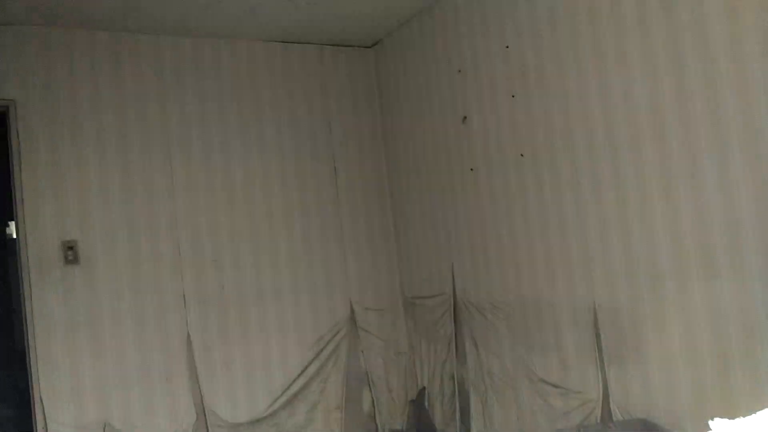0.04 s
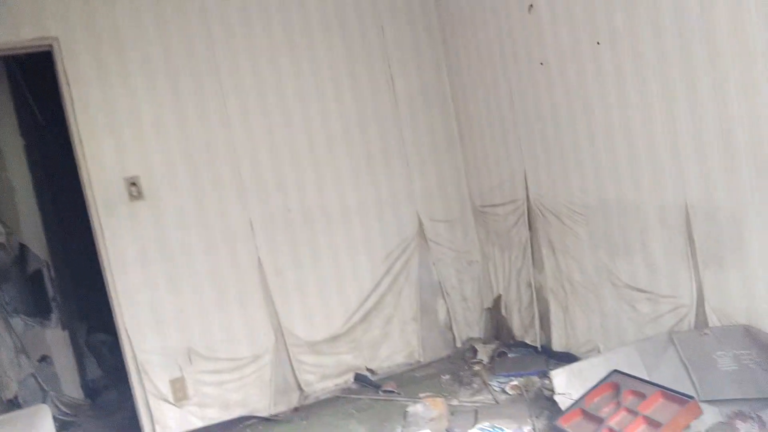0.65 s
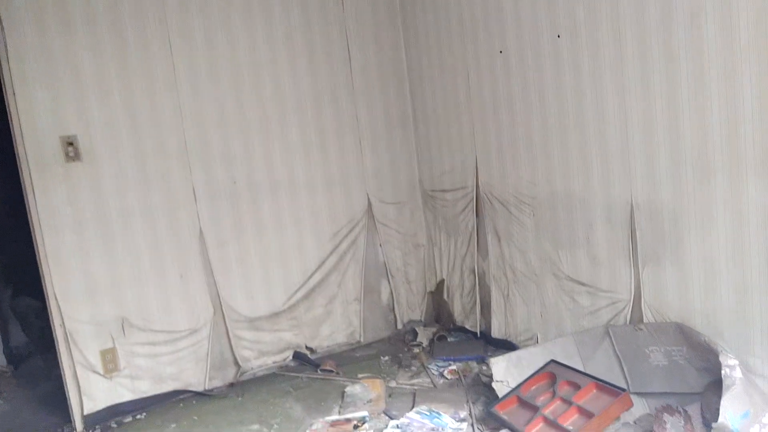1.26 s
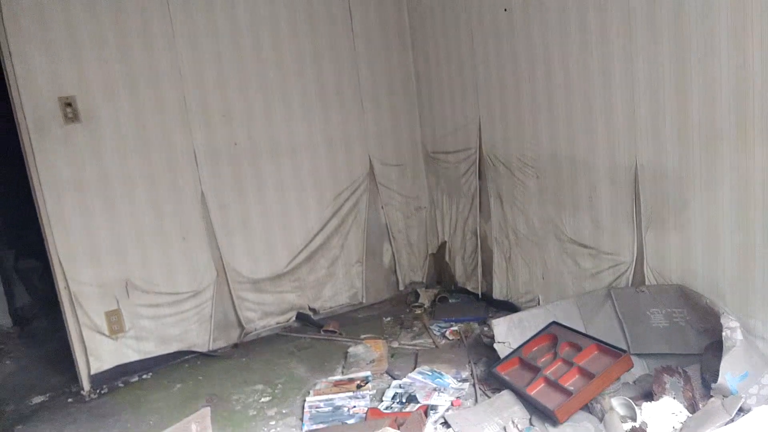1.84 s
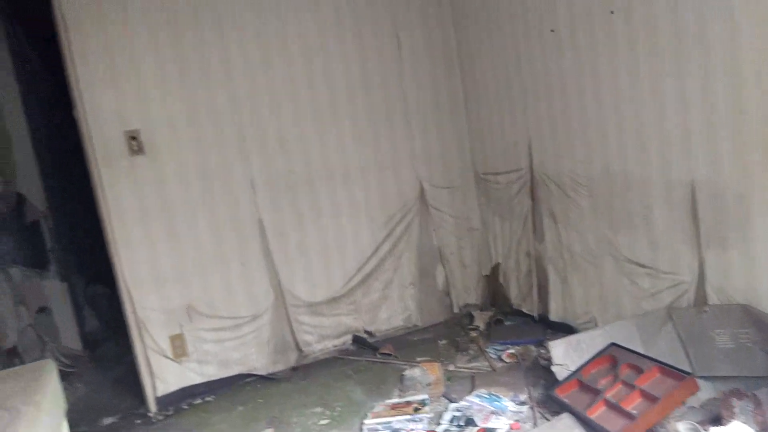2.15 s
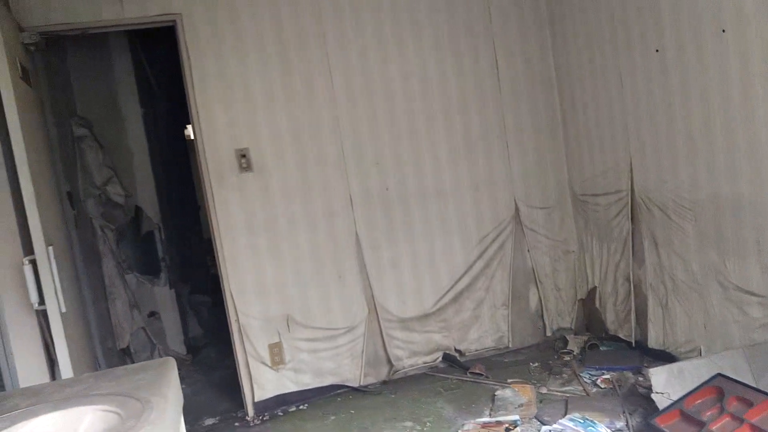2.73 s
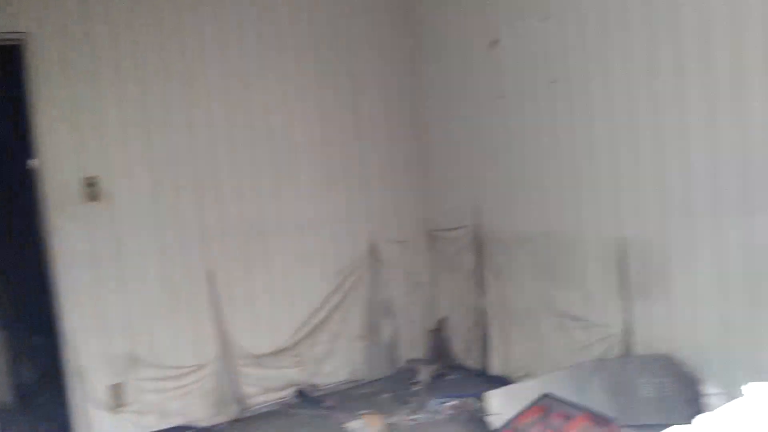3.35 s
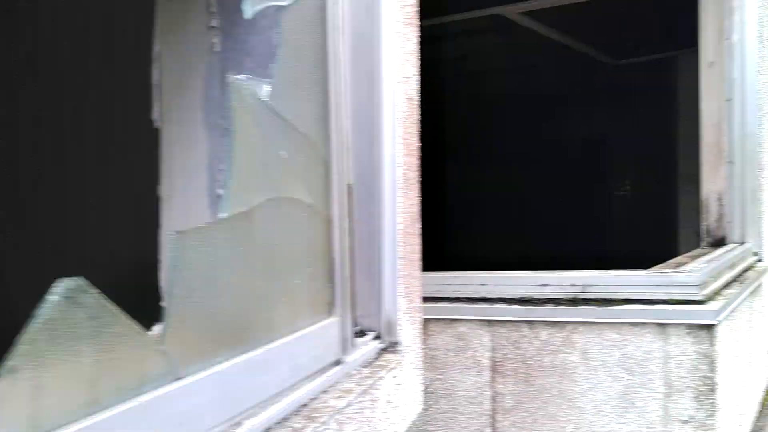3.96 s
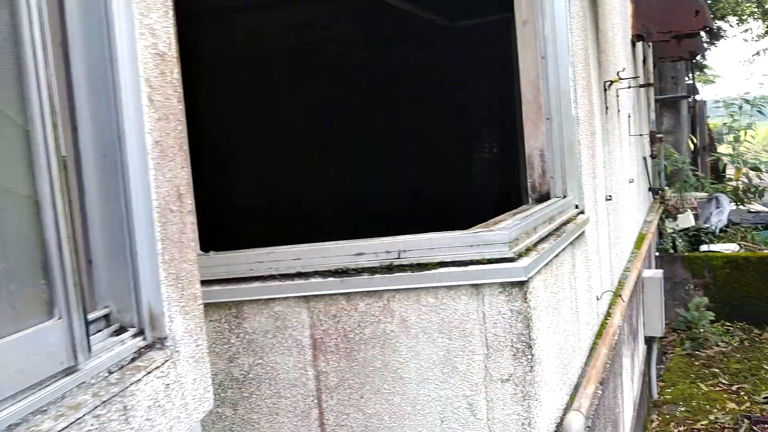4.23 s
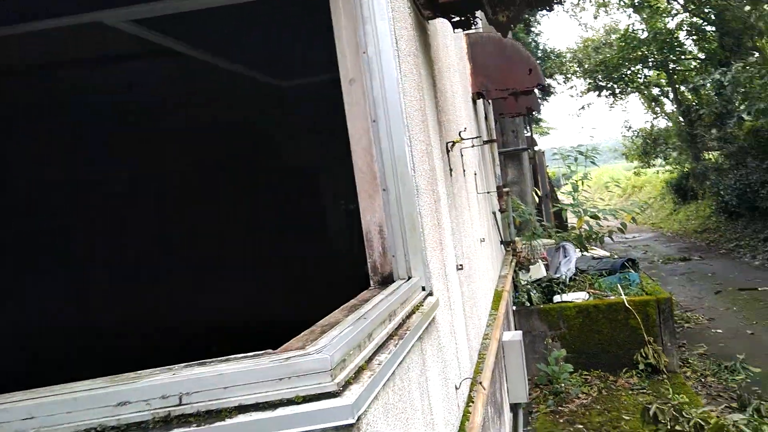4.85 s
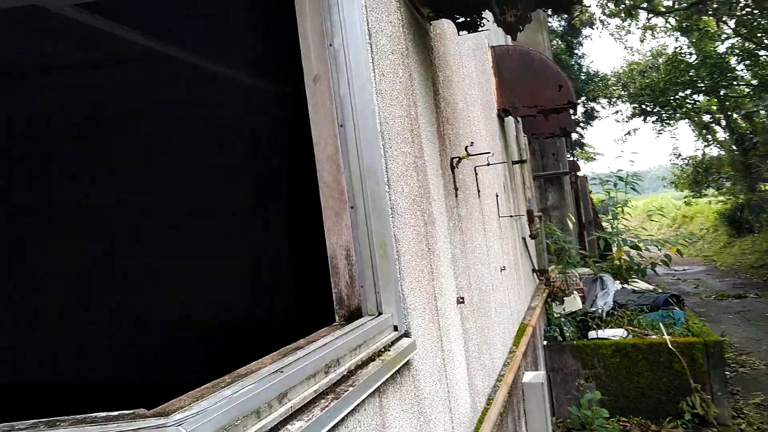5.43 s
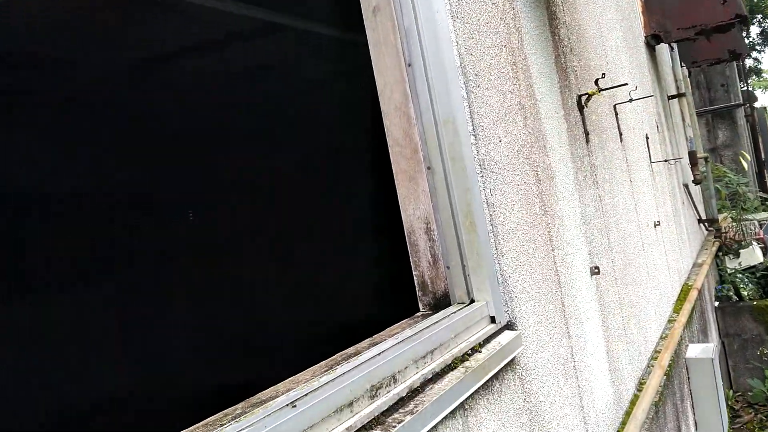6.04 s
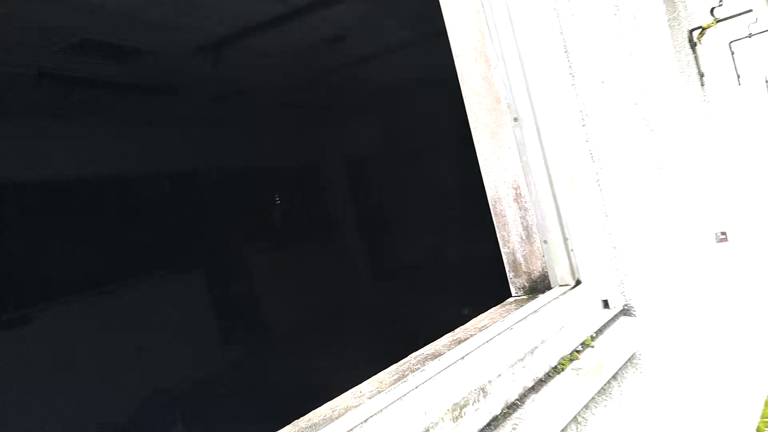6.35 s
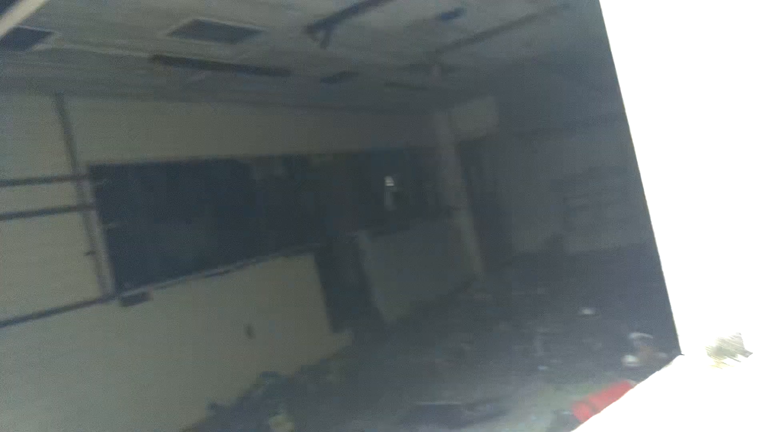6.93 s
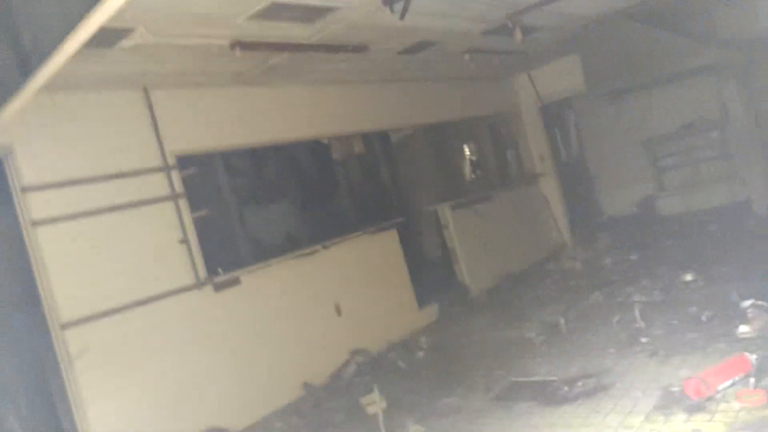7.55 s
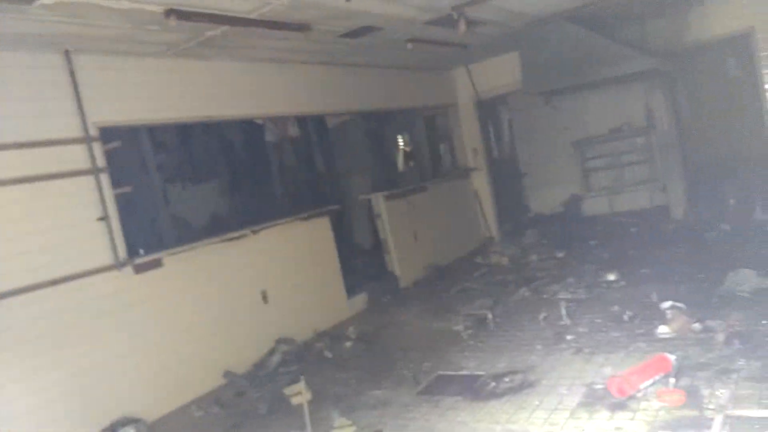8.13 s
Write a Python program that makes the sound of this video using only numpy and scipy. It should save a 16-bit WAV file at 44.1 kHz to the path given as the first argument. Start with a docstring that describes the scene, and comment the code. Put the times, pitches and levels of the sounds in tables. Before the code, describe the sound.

Someone steps slowly over gritty debris at an abandoned building. A few light knocks and scuffs come first, then a lull in which small birds whistle far off. Halfway through, grit crunches and grinds under the soles, followed by heel knocks on loose pieces and a sharp snap of a brittle shard near the end. The steps are close, with a slight room echo, over faint insects and low rumbling air.

```python
"""Slow steps over gritty debris, from one window of an abandoned building to the next.
Heels knock on loose pieces, grit crunches and grinds under the soles, a brittle shard snaps:
each a train of tiny breaks coloured by its material, reflected by a near wall and empty rooms.
Small birds whistle far off, over insects, a distant rush and a low rumble of air."""
import sys
import numpy as np
from scipy import signal
from scipy.fft import rfft, irfft
from scipy.io import wavfile
from scipy.ndimage import uniform_filter1d

SR = 44100
rng = np.random.default_rng(int(sys.argv[2]) if len(sys.argv) > 2 else 0)


def store_pcm(level_fs):
    """Save levels as 16-bit WAV."""
    pcm = np.round(np.clip(level_fs, -1, 1) * 32767).astype(np.int16)
    wavfile.write(sys.argv[1], SR, np.atleast_2d(pcm).T)


N = 361179

# sole rolling over grit: t/s, length/s, grinding level/dB, grain peak/dB, grain ring f/Hz
STROKES = [(3.739, 0.38, -66, -48.5, 2870), (4.221, .22, -61, -43, 2980), (4.689, .21, -45, -38, 4530),
           (5.132, .3, -43, -37.5, 5030), (5.44, 0.19, -47, -38.5, 12000), (6.111, .23, -63, -42, 8900),
           (7.029, .14, -59, -41, 5000), (7.49, 0.25, -55, -33.5, 13000), (7.739, .17, -54, -35, 10970)]
EASE_DB = 10  # drop in weight over a stroke


def amp(db):
    """Decibels to gain."""
    return 10 ** (np.asarray(db) / 20)


def unit(x):
    """Scale to rms 1."""
    return x / np.sqrt(np.mean(x ** 2) + 1e-20)


def read(points, hz):
    """Interpolate on a log-frequency axis."""
    f, value = np.transpose(points)
    return np.interp(np.log(hz + 1), np.log(f + 1), value)


def add(mix, s, sound):
    """Mix a sound in at time s."""
    part = mix[max(round(s * SR), 0):][:len(sound)]
    part += sound[:len(part)]


def at_level(x, db):
    """Give a hit the energy of 10 ms at this level."""
    return amp(db) * x * np.sqrt(SR / 100) / (np.linalg.norm(x) + 1e-12)


def causal(x, db):
    """Minimum-phase filter from a gain per FFT bin."""
    response = np.fft.ifft(np.exp(np.conj(signal.hilbert(np.log(amp(db)))))).real
    return signal.oaconvolve(x, response[:len(db) // 2])[:len(x)]


def colour(x, spectrum, ring_hz=1000, ring_db=0, ring_q=1, treble_db=0):
    """Material spectrum, one piece's resonance of height |ring_db|, and a treble shelf."""
    hz = abs(np.fft.fftfreq(4096, 1 / SR))
    peak = 1 / (1 + (2 * ring_q * (hz / ring_hz - 1)) ** 2)
    resonance_db = 10 * np.log10(1 + (amp(abs(ring_db)) ** 2 - 1) * peak)
    shelf_db = treble_db * hz ** 2 / (hz ** 2 + 2600 ** 2)
    return causal(x, read(spectrum, hz) + resonance_db + shelf_db)


def wash(spectrum, patchy_db):
    """Shaped noise with drifting spectral patches, rms 1."""
    hz = np.fft.rfftfreq(2048, 1 / SR)
    real, imag, patches = rng.standard_normal((3, N // 512 + 5, len(hz)))
    patches = unit(uniform_filter1d(uniform_filter1d(patches, size=9, axis=0), size=25, axis=1))
    frames = (real + 1j * imag) * amp(read(spectrum, hz) + patchy_db * patches)
    return unit(signal.istft(frames.T, nperseg=2048, noverlap=1536)[1][:N])


def reverb(x, t60s, delay_s):
    """Scattered reflections, decaying per band; t60s: f/Hz, T60/s."""
    taps = rng.choice([-1., 1.], SR) * (rng.random(SR) < 5000 / SR) * (np.arange(SR) > delay_s * SR)
    hz, t, frames = signal.stft(taps, SR, nperseg=256)
    tail = signal.istft(frames * amp(-60 * t / read(t60s, hz)[:, None]), SR, nperseg=256)[1]
    return signal.oaconvolve(x, tail / np.linalg.norm(tail))[:N]


def rumble(t, rise_db_per_s=0.6946, gust_s=3.85, gust_width_s=0.29, gust_db=6):
    """Slow eddies press on the microphone, growing toward the open air; one gust."""
    # eddy spectrum: f/Hz, level/dB
    spectrum = [(1, -16), (4, 11), (12, 12), (20, 4.5), (30, -0.5), (50, 1), (65, -10.5), (80, -16),
                (100, -12), (140, -21.5), (300, -27), (700, -49), (3000, -90)]
    db = -52 + rise_db_per_s * t + gust_db * np.exp(-((t - gust_s) / gust_width_s) ** 2)
    gain = amp(read(spectrum, np.fft.rfftfreq(N, 1 / SR)))
    eddies = irfft(rfft(rng.standard_normal(N)) * gain, N)
    return amp(db) * unit(eddies)


def thrum(t, start_s=6.72, rise_s=0.2, fade_db_per_s=3):
    """Low thrum at the second window: quick rise, slow fade."""
    # thrum spectrum: f/Hz, level/dB
    spectrum = [(20, -13), (55, 6), (80, 12), (110, 3), (160, -17), (350, -32), (900, -41)]
    age = np.maximum(t - start_s, 0)
    return np.minimum(age / rise_s, 1) * amp(-55 - fade_db_per_s * age) * wash(spectrum, patchy_db=1.5)


def crickets(t, first_surge_s=0.036, period_s=0.723, settle_s=0.6):
    """Far chorus surging in unison; starts louder and settles."""
    # chorus spectrum: f/Hz, level/dB
    spectrum = [(2800, -18), (3900, -12), (4350, -5.5), (4750, -4.5), (5200, -6.5), (6200, -27),
                (9000, -37)]
    surge_db = 2 * np.cos(2 * np.pi * (t - first_surge_s) / period_s)
    opening_db = 4 * np.exp(-(t / settle_s) ** 2)
    return amp(-71.5 + surge_db + opening_db) * wash(spectrum, patchy_db=1.0)


def outside():
    """Steady hiss, rumbling air, a thrum, a far rush and two kinds of insect."""
    # spectra of air hiss, far rush and insect hiss: f/Hz, level/dB
    air_spectrum = [(60, 10), (170, 11.5), (400, 1.5), (800, -6), (1200, -1.5), (2000, 0), (3000, -16),
                    (5000, 3.5), (6200, -1.5), (7300, 3.5), (8500, -2), (10000, 1.5), (13000, -1),
                    (16000, -13)]
    rush_spectrum = [(80, -30), (160, -3.5), (240, 0), (400, -3.5), (750, -2.5), (1000, 1), (1230, 4),
                     (1500, -0.5), (1900, -1.5), (2600, -8), (5000, -13.5), (16000, -13)]
    insect_spectrum = [(5000, -20.5), (8500, -18), (10400, -17), (11500, -3.5), (12400, -4.5),
                       (13400, -16.5), (16000, -21.5)]
    # nearing the open window: t/s, rush level/dB, insect level/dB
    approach = [(0, -71, -60.5), (1.1, -71, -66.5), (2.0, -68.5, -69), (2.7, -64.5, -66), (3.6, -64, -67),
                (4.2, -60, -67), (7.2, -57.5, -68), (8.19, -56, -63.5)]
    t = np.arange(N) / SR
    s, rush_db, insect_db = np.transpose(approach)
    air = amp(-66.5) * wash(air_spectrum, patchy_db=0.35)
    rush = amp(np.interp(t, s, rush_db)) * wash(rush_spectrum, patchy_db=0.8)
    insects = amp(np.interp(t, s, insect_db)) * wash(insect_spectrum, patchy_db=0.8)
    return air + rumble(t) + thrum(t) + rush + insects + crickets(t)


def birds(quaver_depth=0.0092, flutter_depth=0.46):
    """Thin whistles, each one arch of pitch, wavering in pitch and strength."""
    # calls: t/s, length/s, top f/Hz, sweep/Hz, share of call before the top, relative level/dB
    calls = [(.17, 0.19, 4360, 656, 0.88, -66), (.982, 0.18, 4130, 776, 0.75, -60.5),
             (1.58, .09, 3750, 220, .2, -74), (1.872, 0.11, 3600, 230, 0.43, -63),
             (2.515, 0.1, 3320, 238, 0.53, -63.5), (2.77, 0.066, 4630, 600, .3, -67.5),
             (2.918, 0.096, 4310, 698, .8, -63.5), (2.922, 0.083, 3300, 200, 0.48, -65),
             (3.004, .17, 4360, 403, .75, -63.5), (3.133, .235, 4480, 650, 0.45, -62),
             (3.185, .13, 3660, 327, 0.51, -61.5), (3.487, 0.19, 4270, 677, 0.59, -58.5),
             (3.866, .17, 4290, 221, 0.55, -62.5), (4.219, .18, 4230, 300, 0.54, -62),
             (4.55, 0.077, 4200, 250, .7, -58), (5.8, 0.19, 3520, 100, 0.39, -67.5)]
    out = np.zeros(N)
    for s, length_s, top_hz, sweep_hz, crest, db in calls:
        u = np.linspace(0, 1, int(length_s * SR))
        quaver, flutter = unit(uniform_filter1d(rng.standard_normal((2, SR)), size=120))[:, :len(u)]
        droop = np.maximum(1 - u / crest, (u - crest) / (1 - crest)) ** 2
        hz = (top_hz - sweep_hz * droop) * (1 + quaver_depth * quaver)
        strength = signal.windows.tukey(len(u), 0.25) * (1 + flutter_depth * flutter)
        add(out, s, amp(db) * unit(strength * np.sin(2 * np.pi * np.cumsum(hz) / SR)))
    return out


def fractures(count, per_s, spread_db):
    """Random train of tiny breaks, a few much larger than the rest."""
    size = amp(spread_db * np.minimum(rng.exponential(1, count), 3.5))
    return unit(size * rng.choice([-1, 1], count) * (rng.random(count) < per_s / SR))


def burst(swell_s, decay_s, crack, per_s):
    """Avalanche of breaks around one main crack; returns lead time/s and train."""
    lead = int(0.03 * SR)
    t = (np.arange(SR // 6) - lead) / SR
    envelope = np.exp(np.where(t < 0, t / max(swell_s, 1e-5), -t / decay_s))
    train = fractures(len(t), per_s, spread_db=4.5) * envelope
    train /= np.linalg.norm(train) + 1e-12
    train[lead] += crack
    # whiten, so the material sets the colour
    power = uniform_filter1d(abs(np.fft.fft(train)) ** 2, size=61, mode="wrap")
    return lead / SR, causal(train, -10 * np.log10(power + 1e-3))


def pebble(train, ring_s, modes=7):
    """A piece of grit rings in a few modes after every break."""
    age = np.arange(SR // 40) / SR
    hz = 2000 + 13000 * (np.arange(modes) + rng.random(modes)) / modes
    ring = np.cos(2 * np.pi * hz[:, None] * age).sum(0) * np.exp(-age / ring_s)
    ring /= np.linalg.norm(ring)
    ring[0] += 0.6  # direct click
    return signal.oaconvolve(train, ring)[:len(train)]


def scuffs():
    """Rubber brushes over dust: a soft swell of tiny slips."""
    # scuffs: t/s, length/s, level/dB, treble/dB
    brushes = [(0.615, 0.069, -60.5, 10), (6.005, 0.091, -49, -3), (6.07, 0.11, -59, -4),
               (7.305, 0.079, -51, 0)]
    # sole spectrum: f/Hz, level/dB
    sole = [(80, -23), (250, 7.5), (600, 1), (1100, -3.5), (2400, 1), (4400, 1), (6500, -5.5), (9500, -0.5),
            (12000, 6), (16000, -2)]
    out = np.zeros(N)
    for s, length_s, db, treble_db in brushes:
        count = int(length_s * SR)
        slips = fractures(count, per_s=8100, spread_db=1.5) * np.hanning(count)
        add(out, s, amp(db) * unit(colour(slips, sole, treble_db=treble_db)))
    return out


def pressure(age, length_s, press_s=0.012, lift_s=0.037):
    """Weight on the sole, 0-1: comes on, eases, lifts."""
    contact = np.clip(np.minimum(age / press_s, (length_s - age) / lift_s), 0, 1)
    return contact * amp(-EASE_DB * np.clip(age / length_s, 0, 1))


def grinding(catch_db=2.4, catch_s=0.009):
    """The sole catches and slips, crushing small ringing grains over a fine scrape."""
    # grinding spectrum: f/Hz, level/dB
    spectrum = [(100, 0), (190, 7), (330, -13), (600, -39), (1100, -16), (2000, 2), (3000, -8), (4700, 5.5),
                (7000, -15), (9500, -6.5), (11700, 8.5), (13500, -2.5), (16000, 4)]
    t = np.arange(N) / SR
    jerks = unit(uniform_filter1d(rng.standard_normal(N), size=int(catch_s * SR)))
    weight = sum(amp(db) * pressure(t - s, length_s) for s, length_s, db, *_ in STROKES)
    force = weight * unit(amp(catch_db * jerks))
    age = t[:SR // 60]
    grains = np.zeros(N)
    for hz in np.linspace(1800, 14500, 16):
        ring_s = 0.0018 * np.sqrt(8000 / hz)  # larger grains ring longer
        ring = np.sin(2 * np.pi * hz * rng.uniform(0.9, 0.98) * age)
        ring += 0.5 * rng.standard_normal(len(age))
        ring *= np.exp(-age / ring_s)
        grains += signal.oaconvolve(fractures(N, per_s=80, spread_db=2.2), unit(ring))[:N]
    scrape = 0.3 * rng.standard_normal(N)
    return force * unit(colour(unit(grains) + scrape, spectrum))


def stray_grains(per_s=42, spread_db=1, spread_octaves=0.72):
    """Random grains under each stroke, weaker as the weight eases; rows: t/s, peak/dB, f/Hz."""
    rows = []
    for start_s, length_s, _, peak_db, hz in STROKES:
        count = max(round(per_s * length_s), 1)
        for k, (when, strength, pitch) in enumerate(rng.random((count, 3))):
            u = (k + when) / count
            db = peak_db - EASE_DB * u / 2 + spread_db * (2 * strength - 1)
            rows.append((start_s + u * length_s, db, hz * 2 ** (spread_octaves * (2 * pitch - 1))))
    return rows


def ticks(crest_db=13, bright_db_per_octave=10):
    """Single grains crack; larger ones are lower, duller and slower."""
    # loudest grains: t/s, nominal peak/dB, ring f/Hz
    loud_grains = [(1.851, -40.5, 13500), (5.384, -33, 11900), (6.1841, -27.5, 11400),
                   (6.2142, -30.5, 4530), (6.2582, -30, 14700), (7.0371, -33, 4200), (7.0544, -28, 4200),
                   (7.068, -38, 3100), (7.4989, -37, 13500), (7.5687, -31, 12960), (7.6204, -26.5, 12100),
                   (7.8037, -28.5, 12700), (7.8506, -30, 9400)]
    # grain spectrum: f/Hz, level/dB
    spectrum = [(200, -17), (1000, -19), (1800, -6.5), (2700, 0), (4200, -0.5), (6000, -11.5), (8000, -4),
                (10000, -7.5), (12300, 6), (14000, -3.5), (16000, -3)]
    out = np.zeros(N)
    for s, peak_db, hz in list(loud_grains) + stray_grains():
        bright_db = bright_db_per_octave * np.log2(hz / 12000)
        decay_s = 0.0033 * np.sqrt(4000 / hz)
        lead_s, train = burst(0.00021, decay_s, crack=0.43, per_s=10000)
        grain = colour(pebble(train, ring_s=0.001), spectrum, hz, ring_db=7, ring_q=5, treble_db=bright_db)
        add(out, s - lead_s, at_level(grain, peak_db - crest_db))
    return out


def snaps():
    """A brittle shard breaks in quick stages and rings briefly."""
    # breaks: t/s, level/dB, decay/s, ring f/Hz, ring/dB
    breaks = [(6.934, -32.5, 0.0021, 4000, 21), (7.9462, -18.5, 0.0026, 3800, 3.5),
              (7.9497, -20.5, 0.0018, 2440, 20), (8.091, -31, 0.0029, 2660, 9),
              (8.094, -42, 0.0032, 2750, -2)]
    # shard spectrum: f/Hz, level/dB
    shard = [(100, -54), (300, -8), (550, -12.5), (850, 5.5), (1200, 1), (1700, 1), (2050, -4), (2600, 1),
             (4000, 4), (5600, -7.5), (8200, 2), (9800, -3.5), (12300, 6), (16000, -0.5)]
    out = np.zeros(N)
    for s, db, decay_s, hz, ring_db in breaks:
        lead_s, train = burst(0.00024, decay_s, crack=0.08, per_s=23000)
        add(out, s - lead_s, at_level(colour(train, shard, hz, ring_db, ring_q=9), db))
    return out


def knocks():
    """A heel pushes a loose piece against the ground: dull blow, short rattle."""
    # blows: t/s, level/dB, ring f/Hz, hardness as treble/dB, decay/s
    blows = [(0.3213, -42, 1840, -4.5, 0.0033), (.378, -52, 418, -4, 0.013),
             (6.2874, -34, 1120, -8, 0.0026), (6.8957, -36.5, 514, 13, 0.0087),
             (6.9326, -31, 623, 4, 0.0014), (6.946, -40, 1290, 16, 0.003), (7.134, -57, 400, -6, 0.0047),
             (7.379, -48.5, 266, -1, 0.017)]
    # heel spectrum: f/Hz, level/dB
    heel = [(60, -13), (170, -7.5), (330, -4.5), (550, -6), (900, -7), (1300, -0.5), (1800, -12.5),
            (2800, -10), (4000, -6.5), (6000, -20), (11500, -14.5), (16000, -29)]
    out = np.zeros(N)
    for s, db, hz, hard_db, decay_s in blows:
        lead_s, train = burst(0, decay_s, crack=0.13, per_s=9000)
        blow = colour(train, heel, hz, ring_db=14.5, ring_q=3.1, treble_db=hard_db)
        add(out, s - lead_s, at_level(blow, db))
    return out


def crunches():
    """Clumps of grit collapse, ringing the loose stones and the piece beneath."""
    # collapses: t/s, level/dB, swell/s, decay/s, ring f/Hz, ring/dB
    clumps = [(.771, -48, 0.011, .0097, 1470, 9), (.84, -49.5, 0.0033, 0.01, 1970, 7),
              (3.867, -51.5, 0.0097, 0.009, 1650, 23), (4.033, -49, 0.00042, 0.0018, 2900, 11.5),
              (4.625, -26, 0.0043, 0.008, 2780, 11.5), (4.689, -30, 0.00089, 0.0084, 3200, 6),
              (4.717, -35, .0008, 0.014, 1670, 5.5), (4.78, -39.5, .0023, .0035, 12500, 7),
              (4.794, -38, 0.0012, .0059, 1600, 10), (4.83, -37, .003, 0.0073, 1640, 7.5),
              (4.874, -44, 0.0031, .0069, 4270, 4), (5.0614, -28.5, 0.0015, .0044, 1100, 5.5),
              (5.0841, -33, .0001, 0.0058, 1870, 10), (5.207, -44.5, .0013, 0.0081, 2076, 14),
              (5.561, -44.5, 0.00093, 0.0029, 2515, 9), (5.647, -44, .004, .003, 1570, 12)]
    # grit spectrum: f/Hz, level/dB
    grit = [(100, -19), (200, -11.5), (550, -12), (950, -4), (1300, -7.5), (1800, -1.5), (3000, -2),
            (4400, 3.5), (5400, -5), (7000, -7), (9500, -6), (11800, 4), (13500, -3), (16000, -3.5)]
    out = np.zeros(N)
    for s, db, swell_s, decay_s, hz, ring_db in clumps:
        lead_s, train = burst(swell_s, decay_s, crack=0.15, per_s=6000)
        stones = train + 0.5 * pebble(train, ring_s=0.0016)
        add(out, s - lead_s, at_level(colour(stones, grit, hz, ring_db, ring_q=4), db))
    return out


def scene():
    """Close steps with wall and room reflections; birds in the trees; outdoor background."""
    # decay of the empty rooms: f/Hz, T60/s
    room_t60s = [(100, 0.39), (1000, 0.28), (2500, 0.28), (6000, 0.45), (16000, 0.18)]
    steps = knocks() + crunches() + ticks() + snaps() + scuffs() + grinding()
    near_wall = amp(-10) * reverb(steps, [(100, 0.059), (16000, 0.078)], delay_s=0.004)
    rooms = amp(-16.5) * reverb(steps, room_t60s, delay_s=0.015)
    song = birds()
    trees = amp(-4) * reverb(song, [(3000, 0.6), (5000, 0.6)], delay_s=0.003)
    return (steps + near_wall + rooms + amp(-5) * (song + trees) + outside())[None]


def record(dry, ceiling=0.45, cutoff_hz=16050):
    """Microphone soft clipping, then a low-pass."""
    pressed = ceiling * np.tanh(dry / ceiling)
    low_pass = signal.firwin(301, cutoff_hz, window=("kaiser", 8), fs=SR)
    return signal.oaconvolve(pressed, low_pass[None], "same")


dry = scene()
out = record(dry)
store_pcm(out)
```